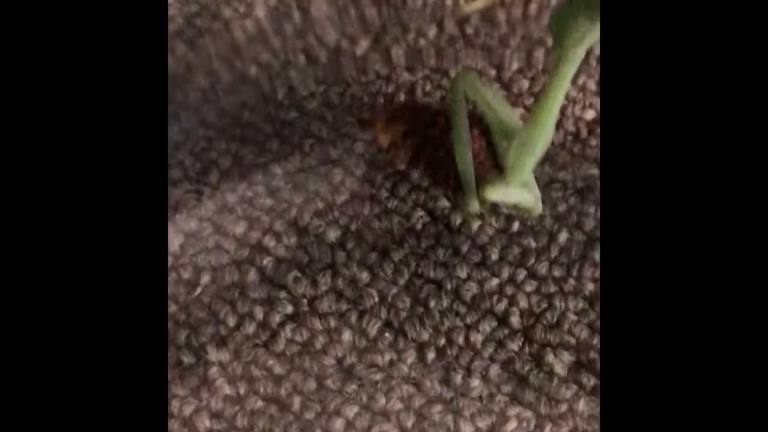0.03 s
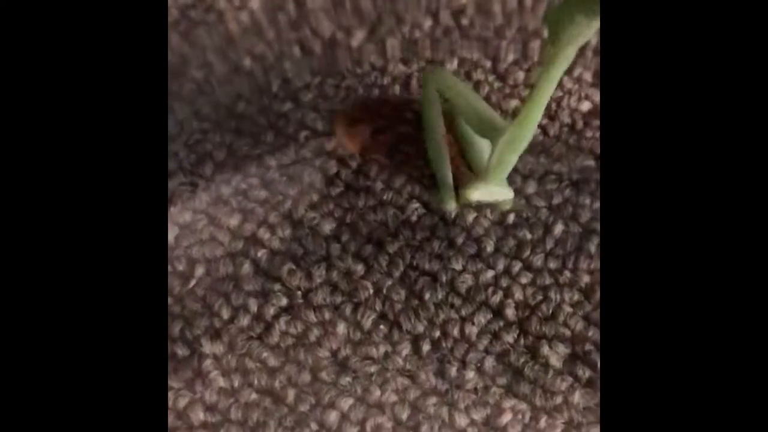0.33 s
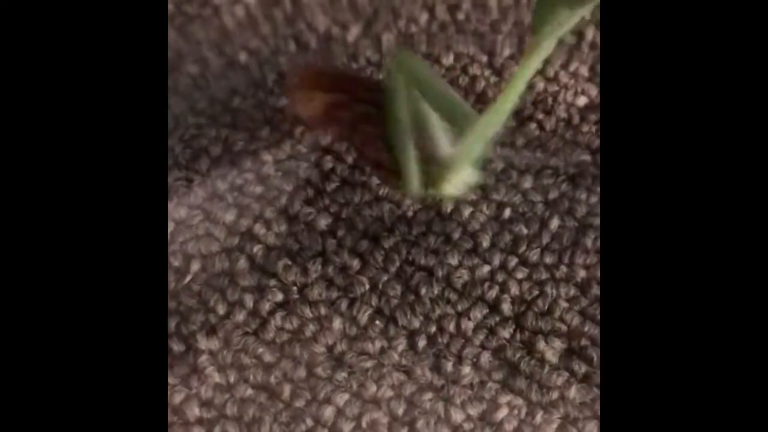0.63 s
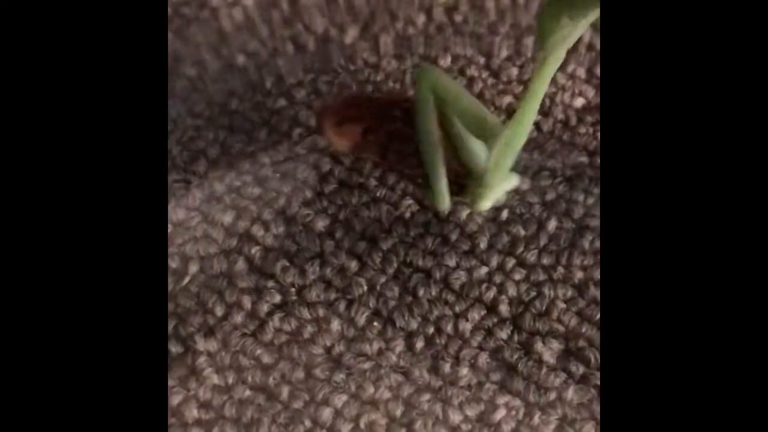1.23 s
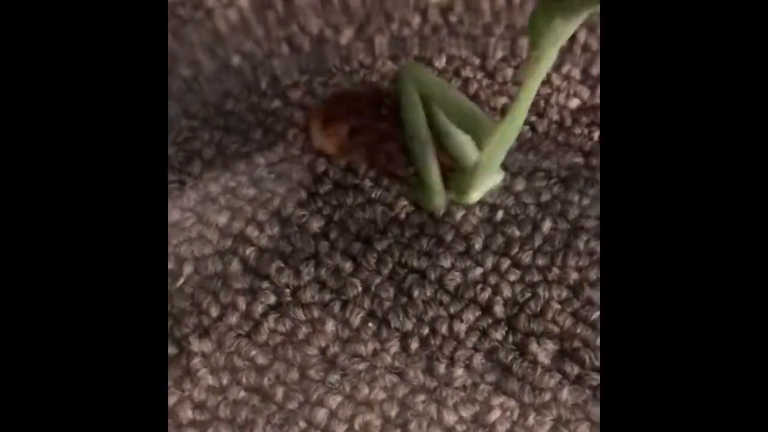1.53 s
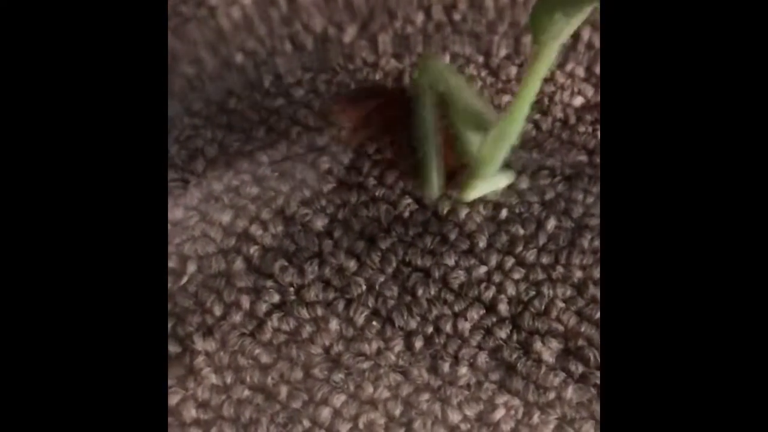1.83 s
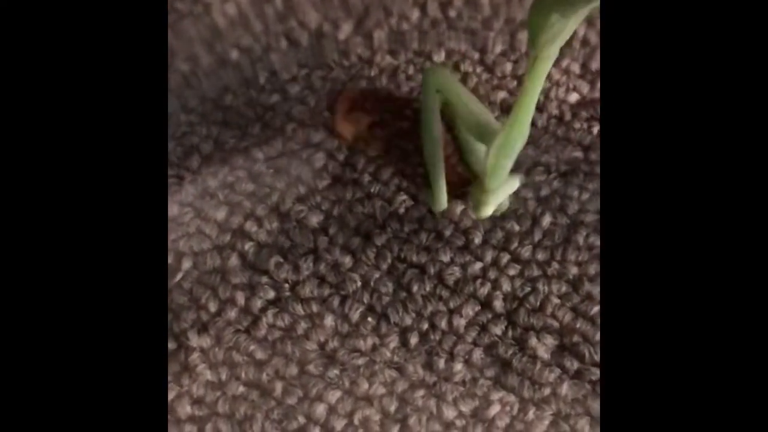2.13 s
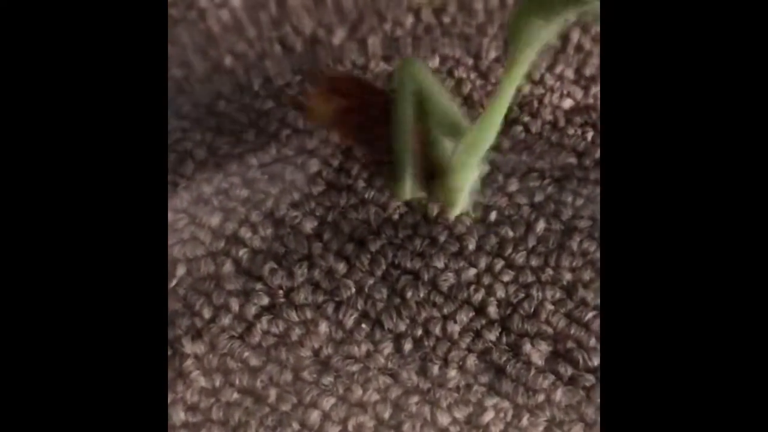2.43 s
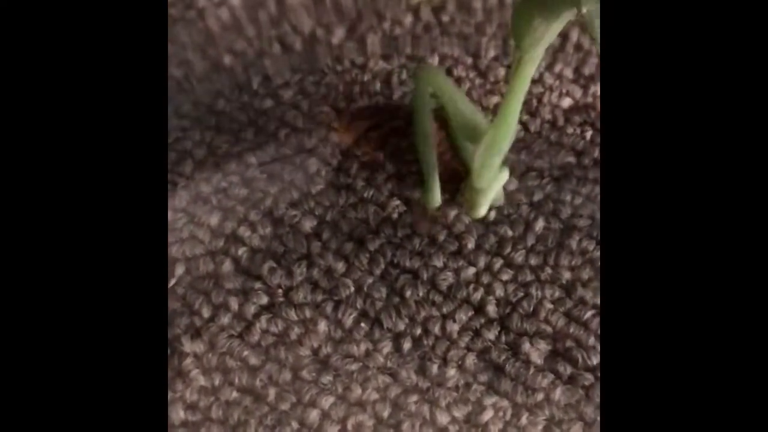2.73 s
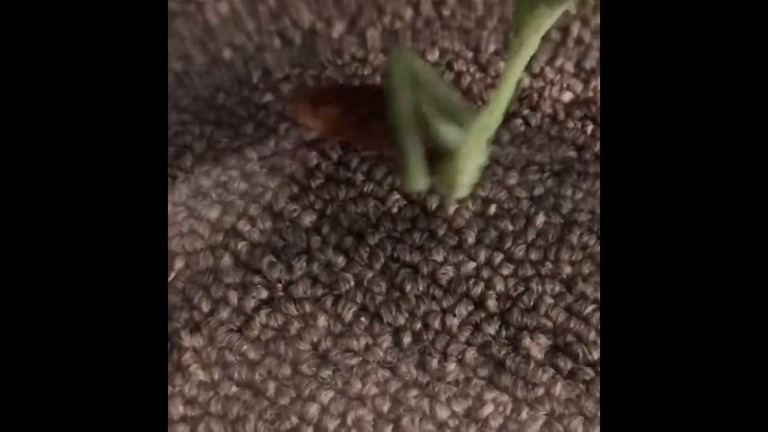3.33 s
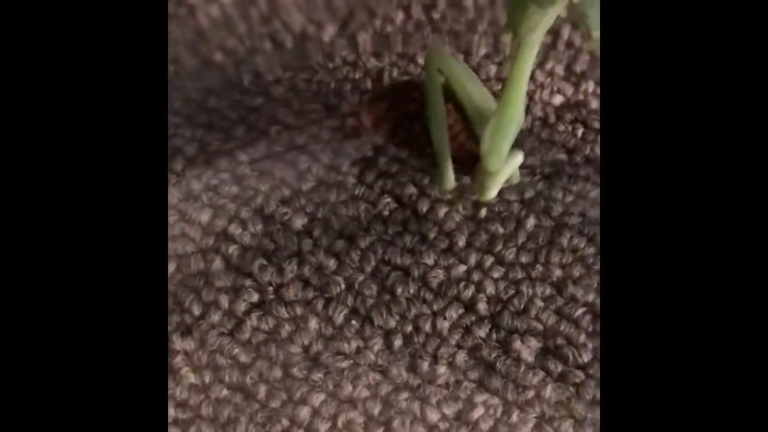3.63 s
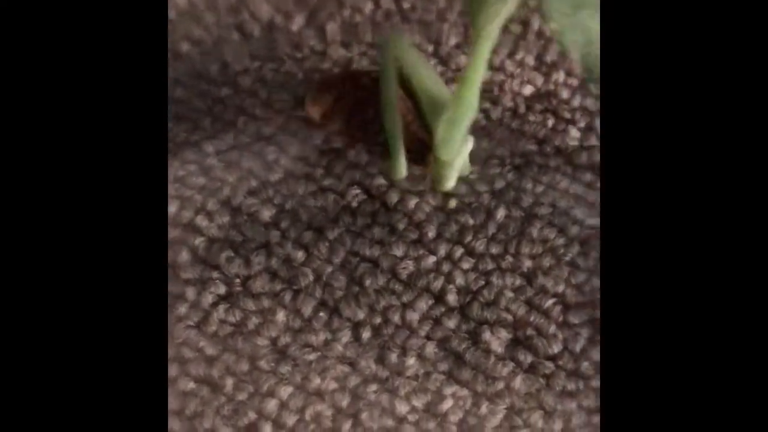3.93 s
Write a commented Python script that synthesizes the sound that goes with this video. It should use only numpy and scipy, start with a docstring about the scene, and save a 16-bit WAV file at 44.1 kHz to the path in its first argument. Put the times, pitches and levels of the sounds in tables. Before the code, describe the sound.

Two insects click and scratch faintly on fabric, close by. Dry, irregular snaps come throughout, sharper at about 0.5 and 0.8 seconds and sharpest at 3.7. Fine rustling, crackling and short leg scrapes rise from 1.4 to 2.2 seconds and again from 3.1, starting with a tiny squeak. Underneath, a quiet room carries a low, wavering machine hum, a deep rumble and a few soft bumps.

```python
"""Dry little clicks and scratches come from two insects struggling close by on a looped fabric.
Their jaws and claws snap on shell and threads, their legs scrape in short strokes, and one claw squeaks.
Their bodies drag over the fabric with a fine rustle, and claws rake its fibres with a bright crackle.
Behind them is a quiet room with a low machine hum, a deep rumble and a few dull bumps."""
import sys
import numpy as np
from scipy import signal
from scipy.fft import rfft, irfft
from scipy.io import wavfile

SR = 44100
rng = np.random.default_rng(int(sys.argv[2]) if len(sys.argv) > 2 else 0)


def to_wav(s):
    """Save 16-bit WAV."""
    ch = np.atleast_2d(s).T  # columns
    pcm = np.round(np.clip(ch, -1, 1) * 32767)  # PCM
    wavfile.write(sys.argv[1], SR, pcm.astype(np.int16))


N = 176400  # 4 seconds
ECHO_S = .00122  # delay of the echo from a close surface

# How strong each pitch is in a snap, from low to high: pitch_hz, gain_db
SNAP_COLOUR = [(300, -28), (1500, -15), (2600, -15), (4000, -7), (6500, 0), (9000, -3.5), (10400, -5.5),
               (12500, -0.5), (16000, -1)]


def clicks(size=1024, lead_in=64):
    """Jaws and claws snap: tiny slips lead up to a sharp pulse, which crumbles and dies away."""
    # One snap a row: start_s, strength_db, body_db, sheen_db, roughness_db
    snaps = [(.427,-48,-5,-2,0), (.5068,-22,-11,-17,-2.5), (.5916,-45,-5,0,-1), (0.7659,-19.5,-10,-21,-6),
             (0.844,-41,18.5,-4,-3), (.8816,-34,6,-4,-4), (.91,-34.5,-2,1,-1), (1.268,-37,-13,-4,-2),
             (1.5278,-41,-12,4,2), (1.613,-30,-7,1,6.5), (1.8553,-37.5,11,7,1), (1.8824,-36.5,-3,10,2),
             (1.9453,-28.5,4,-8,-0.5), (2.3892,-41,3,-17,0), (2.436,-36.5,8,-3,2.5), (2.4473,-46,-12,0,-3),
             (2.4599,-41,-14,-2,-3), (2.4661,-48,-12,-2,-5), (2.4745,-43,-12,3,-3), (2.505,-37,-2,-12,-3),
             (2.522,-34,-4,-15.5,3), (2.6848,-41,16,1,1.5), (2.7102,-33.5,9.5,6,-3), (2.7175,-42.5,20,11,0),
             (2.748,-31,-4.5,2,-2.5), (2.971,-37,4,-17,10), (2.974,-33.5,10,-15,-4),
             (2.9832,-44,-10.5,4,-1), (2.9927,-35.5,-11,5,-6), (3.0045,-43,-3,6,0), (3.0291,-37,8,-6,-2),
             (3.2195,-38.5,3,13,1.5), (3.45,-32,14,-5,-3.5), (3.485,-28.5,-2,-16,-7),
             (3.505,-23,-0.5,-8,-5), (3.661,-33.5,3.5,-5,5.5), (3.6746,-14.5,-20,-15,-10),
             (3.9849,-29.5,0,-6,-5)]
    hz = np.fft.rfftfreq(size, 1 / SR)
    t = (np.arange(size) - lead_in) / SR
    body = 1 / (1 + (hz / 5370) ** 6)  # the lower pitches
    sheen = np.exp(-((hz - 16100) / 4900) ** 2)  # the very highest pitches
    # The slips before, the crumbling after and the faint tail: when, fade_s, gain_db
    stages = [(t < 0, .0003, -5), (t > 0, .0005, -4), (t > 0, .003, -3)]
    out = np.zeros(N)
    for start_s, strength_db, body_db, sheen_db, roughness_db in snaps:
        force = np.zeros(size)
        for when, fade_s, gain_db in stages:
            slips = rng.standard_normal(size) * when * np.exp(-abs(t) / fade_s)
            force += undb(gain_db + roughness_db) * unit(slips) / np.sqrt(size)
        force[lead_in] += 1  # the snap itself
        force[lead_in + int(ECHO_S * SR)] += undb(-15)  # its echo
        spectrum_db = strength_db + colour_db(SNAP_COLOUR, hz) + body_db * body + sheen_db * sheen
        add(out, start_s + t[0], signal.fftconvolve(sharp_pulse(spectrum_db), force))
    return out


def leg_scrapes():
    """In each stroke a leg catches and slips over many threads, and rings a little."""
    # One stroke a row: start_s, length_s, level_db, pitch_hz, width_hz
    strokes = [(.12, .03, -70.5, 13000, 7000), (.315, .04, -84, 12000, 8000),
               (0.77, 0.023, -67, 7000, 5000), (0.83, 0.027, -67.5, 4900, 2500),
               (0.842, .035, -71, 13500, 6000), (1.01, .26, -74, 2730, 350), (1.12, .02, -77, 12000, 8000),
               (1.403, 0.018, -62, 4700, 3000), (1.554, 0.04, -65, 3200, 3500),
               (1.596, 0.04, -62.5, 3900, 3000), (1.856, .02, -63, 4300, 2500),
               (1.951, 0.026, -67, 5000, 5000), (2.027, 0.0081, -62, 3500, 4000),
               (2.043, 0.029, -58, 4140, 4060), (2.19, 0.015, -64, 4970, 6000),
               (2.388, 0.013, -68.5, 6000, 5000), (2.44, .052, -78, 12000, 8000),
               (2.525, 0.045, -75, 6500, 6000), (3.069, .014, -73, 5500, 4000),
               (3.109, .05, -65.5, 3000, 3000), (3.19, .02, -66, 5500, 6000),
               (3.22, 0.021, -59.5, 4080, 5000), (3.254, .0094, -57, 4350, 5000),
               (3.286, 0.012, -64.5, 3300, 2500), (3.361, 0.0083, -57, 3000, 6000),
               (3.378, 0.0081, -56.5, 3800, 4000), (3.388, 0.017, -57.5, 4500, 5000),
               (3.405, 0.0072, -59, 3600, 4000), (3.431, 0.012, -64.5, 4300, 1800),
               (3.455, 0.021, -58, 5000, 6000), (3.504, 0.019, -60, 8000, 8000),
               (3.514, 0.063, -59, 3280, 6000), (3.528, 0.0054, -62, 4800, 6000),
               (3.543, 0.0044, -55, 5500, 6000), (3.568, 0.0054, -61, 4500, 6000),
               (3.621, 0.01, -51, 3300, 3200), (3.619, 0.011, -53, 1200, 1800),
               (3.746, 0.011, -60.5, 5330, 3000), (3.957, .015, -62.5, 4700, 1100)]
    # The pitches at which the legs ring: pitch_hz, width_hz, gain_db
    leg_rings = [(1740, 53, 8), (2174, 43, 7), (4230, 50, -36)]
    slips = grains(per_s=2200, scatter_db=2.6)
    rub = np.zeros(N)
    for start_s, length_s, level_db, pitch_hz, width_hz in strokes:
        scrape = resonate(resonate(slips, pitch_hz, width_hz), pitch_hz, width_hz)
        rub += undb(level_db) * push(start_s, length_s) * unit(scrape)
    return rub + sum(undb(db) * resonate(rub, hz, width) for hz, width, db in leg_rings)


def claw_squeak(start_s=3.1275, length_s=.0095):
    """A claw slips on a thread in one quick burst and rings at a few clear pitches."""
    # The pitches in the squeak: pitch_hz, width_hz, gain_db
    rings = [(2166, 36, -0.5), (2500, 100, 0.5), (2960, 120, -1), (4600, 77, 3), (4720, 56, 1),
             (5430, 250, 0), (5960, 90, -11), (7200, 130, -2), (7800, 72, -3)]
    slips = rng.standard_normal(N) * push(start_s, length_s)
    squeak = np.zeros(N)
    for pitch_hz, width_hz, gain_db in rings:
        ring = resonate(slips, pitch_hz, width_hz)
        squeak += undb(gain_db) * unit(resonate(ring, pitch_hz, 3.5 * width_hz))  # trim far-off hiss
    time_share = length_s * SR / N / 2  # so the level counts over the burst, not the whole scene
    return undb(-48) * unit(squeak) * np.sqrt(time_share)


def body_rustle():
    """Bodies drag over the fabric, and thousands of tiny fibre ticks blur into a rustle."""
    # How loud the dragging is: time_s, level_db
    drag_levels = [(0, -74), (1.22, -78), (1.4, -67), (1.5, -70.5), (1.6, -67.5), (1.69, -71.5),
                   (1.78, -70.5), (1.92, -70), (2.07, -68.5), (2.15, -72), (2.3, -76), (3.08, -77),
                   (3.13, -60.5), (3.23, -69), (3.33, -68), (3.42, -65), (3.55, -67), (3.6, -66.5),
                   (3.78, -71.5), (4, -71.5)]
    # How strong each pitch is in the rustle: pitch_hz, gain_db
    drag_colour = [(500, -25), (1500, 8), (3500, 6), (6000, 3.5), (9000, -5), (10400, -8), (12000, -5),
                   (15500, -11.5)]
    ticks = grains(per_s=3000, scatter_db=2.5)
    return curve(drag_levels) * unit(coloured(ticks, drag_colour))


def claw_crackle():
    """Claws rake the finest fibres, making a bright crackle."""
    # How loud the raking is: time_s, level_db
    rake_levels = [(1.25, -85), (1.45, -75), (1.62, -69.5), (1.68, -76.5), (1.74, -70), (1.86, -73),
                   (1.92, -73.5), (2.06, -71), (2.25, -100), (3.08, -91.5), (3.16, -72), (3.26, -72),
                   (3.33, -81.5), (3.47, -74), (3.56, -79), (3.6, -90)]
    # How strong each pitch is in the crackle: pitch_hz, gain_db
    rake_colour = [(3000, -25), (6000, -1), (9000, 6), (10400, -7), (12500, 3), (15500, 1.5)]
    ticks = grains(per_s=800, scatter_db=2.6)
    return curve(rake_levels) * unit(coloured(ticks, rake_colour))


def stray_threads():
    """Stray threads let go in soft flurries of ticks."""
    ticks = coloured(grains(per_s=500, scatter_db=1.2), SNAP_COLOUR)
    flurries = undb(17 * np.tanh(waver(rate_hz=22)))
    return undb(-80.5) * unit(ticks * flurries)


def machine_hum():
    """A machine hums on four wavering tones: the lowest swells and the second throbs."""
    # The tones of the hum: pitch_hz, width_hz, base_level_db
    tones = [(92.7, 3.88, -47.5), (244.6, 8.53, -51), (330.5, 6.23, -67), (468, 10.4, -70.5)]
    # The swelling of the lowest tone: time_s, gain_db
    swell_levels = [(0, -3), (.24, 4.5), (.45, -6.5), (.8, -2), (1.1, 0), (1.42, -12), (1.61, 5.5),
                    (1.78, -9), (1.88, 5.5), (2.02, -7), (2.95, -7.5), (3.12, 2.5), (3.24, 8), (3.43, 5),
                    (3.54, -3.5), (4, -1.5)]
    # The uneven throbbing of the second tone: time_s, gain_db
    throb_levels = [(0, -18), (.05, 0), (.13, -3), (.19, 2), (.28, -11), (.345, 6.5), (.43, -23),
                    (.49, 9.5), (.6, -20), (.7, 2.5), (.85, -10), (.91, 5.5), (1.02, -10.5), (1.16, 1),
                    (1.34, -10.5), (1.46, 9), (1.55, -13), (1.61, 4.5), (1.67, -15), (1.73, 4), (1.91, -8),
                    (2.13, 3.5), (2.25, -6.5), (2.38, 3.5), (2.46, -2.5), (2.62, -6), (2.69, 8),
                    (2.76, -17), (2.82, 6.5), (2.97, -14), (3.27, 2), (3.35, -16), (3.43, 8.5),
                    (3.49, -2.5), (3.54, 6), (3.62, -9), (3.68, 4), (3.74, -6.5), (3.88, 3.5), (4, -11)]
    swell = curve(swell_levels)
    gains = [swell, curve(throb_levels), 1, 1]
    bends_hz = [.5 * 20 * np.log10(swell), 0, 0, 0]  # the lowest tone rises .5 Hz per dB of swell
    return sum(gain * undb(db) * tone(hz + bend, width)
               for (hz, width, db), gain, bend in zip(tones, gains, bends_hz))


def rumble():
    """A deep tone comes and goes beneath the hum."""
    # How loud the rumble is: time_s, level_db
    rumble_levels = [(0, -71), (.5, -45.5), (.9, -46), (1.15, -44), (1.35, -70), (2.1, -65), (2.35, -52),
                     (2.6, -59), (3.3, -61.5), (3.8, -53), (4, -48)]
    return curve(rumble_levels) * tone(pitch_hz=46.6, width_hz=4.5)


def bumps(fade_s=.035):
    """Each soft, dull bump is a low tone that quickly swells and fades."""
    # One bump a row: peak_s, pitch_hz, level_db
    thuds = [(.6, 130, -41.5), (.93, 68, -52), (1.1, 84.1, -45.5), (1.92, 71.9, -43), (3.66, 80.1, -41),
             (3.95, 69.7, -42.5)]
    t = np.arange(N) / SR
    out = np.zeros(N)
    for peak_s, pitch_hz, level_db in thuds:
        swell = np.exp(-((t - peak_s) / fade_s) ** 2)
        out += undb(level_db) * swell * unit(np.sin(2 * np.pi * (pitch_hz * t + rng.random())))
    return out


def room_air():
    """The air in the room makes a steady, low rush in which a few pitches ring faintly."""
    # How strong each pitch is in the rush: pitch_hz, gain_db
    room_colour = [(20, -49), (30, -12), (40, -11.5), (48, 0), (57, -9), (70, 2), (85, 0), (105, -3.5),
                   (125, -3), (160, -7.5), (188, -13.5), (215, -8.5), (270, -10.5), (310, -18), (400, -23),
                   (560, -30.5), (800, -31.5), (1100, -33.5), (1300, -35.5), (1700, -38), (2200, -39),
                   (2700, -45.5), (3300, -42), (5000, -50.5), (7500, -57), (9600, -56), (10400, -83),
                   (11500, -60.5), (15500, -64)]
    # The faint ringing of the air: pitch_hz, width_hz, level_db
    air_rings = [(689, 18, -72.5), (762, 8.4, -74.5), (866, 26, -71.5), (977, 81, -70.5), (1114, 19, -74),
                 (1455, 20, -76), (1573, 13, -80.5), (1737, 16, -78), (2600, 62, -83), (2735, 210, -73.5),
                 (3610, 120, -80), (5410, 130, -86.5)]
    rings = sum(undb(db) * unit(resonate(rng.standard_normal(N), hz, width))
                for hz, width, db in air_rings)
    return undb(-42.5) * unit(coloured(rng.standard_normal(N), room_colour)) + rings


def close_echoes(x, size=2048, fade_s=.0049):
    """Close surfaces bounce the sound back as a short blur and one faint echo."""
    blur = rng.standard_normal(size) * np.exp(-np.arange(size) / SR / fade_s)
    response = undb(-3) * unit(blur) / np.sqrt(size)
    response[0] += 1  # the direct sound
    response[int(ECHO_S * SR)] += undb(-36)
    return signal.fftconvolve(x, response)[:N]


def sharp_pulse(spectrum_db):
    """The shortest pulse that starts at once and has the given strength at each pitch."""
    cepstrum = irfft(np.log(undb(spectrum_db)))
    half = len(cepstrum) // 2
    # Folding the second half onto the first packs the energy at the start.
    cepstrum[1:half] *= 2
    cepstrum[half + 1:] = 0
    return irfft(np.exp(rfft(cepstrum)))


def push(start_s, length_s, rise_share=.17):
    """The loudness of one stroke: a quick rise and a slower release."""
    progress = (np.arange(N) / SR - start_s) / length_s
    return np.sqrt(np.interp(progress, [0, rise_share, 1], [0, 1, 0]))


def grains(per_s, scatter_db):
    """Tiny ticks of uneven size at random times."""
    ticks = (rng.random(N) < per_s / SR) * rng.choice([-1, 1], N)
    sizes = undb(scatter_db * np.minimum(rng.exponential(size=N), 5))
    return unit(ticks * sizes)


def tone(pitch_hz, width_hz):
    """A tone that wavers in loudness and pitch; more width makes it less steady."""
    flutter = 1 + .22 * waver(width_hz)
    wandering_hz = pitch_hz + width_hz / 2 * waver(width_hz)
    return unit(flutter * np.sin(2 * np.pi * np.cumsum(wandering_hz) / SR))


def waver(rate_hz):
    """A slow, random drift up and down, about 1 in size."""
    hz = np.fft.rfftfreq(N, 1 / SR)
    return unit(irfft(rfft(rng.standard_normal(N)) * np.exp(-(hz / rate_hz) ** 2), N))


def resonate(x, pitch_hz, width_hz):
    """Keep the sound near one pitch; a narrower width rings longer."""
    pitch_hz = min(pitch_hz, .45 * SR)
    return signal.lfilter(*signal.iirpeak(pitch_hz, pitch_hz / min(width_hz, SR / 4), fs=SR), x)


def coloured(x, points):
    """Turn the pitches of a sound up or down along (pitch_hz, gain_db) points."""
    hz = np.fft.rfftfreq(len(x), 1 / SR)
    return irfft(rfft(x) * undb(colour_db(points, hz)), len(x))


def colour_db(points, hz):
    """Join up (pitch_hz, gain_db) points and read the gain at the given pitches."""
    pitch_hz, gain_db = np.array(points).T
    return np.interp(np.log(hz + 1), np.log(pitch_hz), gain_db)


def curve(points):
    """Join up (time_s, level_db) points into a volume for every sample."""
    return undb(np.interp(np.arange(N) / SR, *np.array(points).T))


def add(out, start_s, x):
    """Mix a sound in at a given time."""
    first = int(np.clip(start_s * SR, 0, N - 1))
    out[first:first + len(x)] += x[:N - first]


def undb(db):
    """Turn decibels into a number to multiply by."""
    return 10 ** (np.asarray(db) / 20)


def unit(x):
    """Scale a sound to an average strength (rms) of 1."""
    return x / np.sqrt(np.mean(x ** 2) + 1e-30)


def scene():
    """Mix the insects and the room into one channel."""
    snaps = clicks()
    rubbing = leg_scrapes() + body_rustle() + claw_crackle() + stray_threads()
    insects = snaps + close_echoes(rubbing) + claw_squeak()
    background = room_air() + machine_hum() + rumble() + bumps()
    return (insects + background)[None]


def record(dry):
    """Cut the very highest treble, above 16050 Hz."""
    return signal.fftconvolve(dry, signal.firwin(255, 16050, fs=SR)[None], mode="same")


dry = scene()
out = record(dry)
to_wav(out)
```